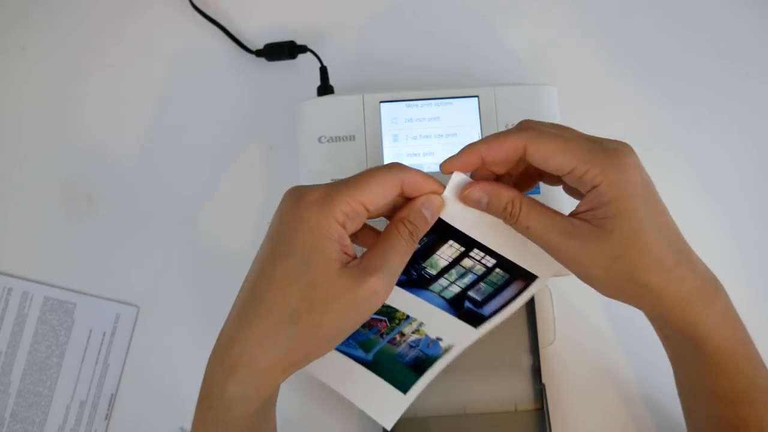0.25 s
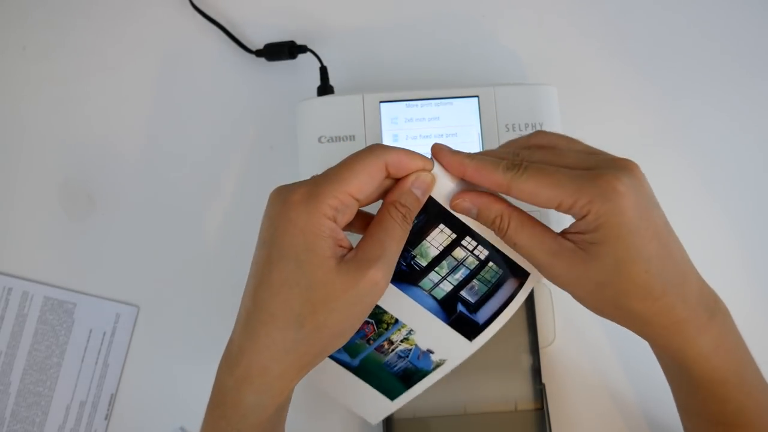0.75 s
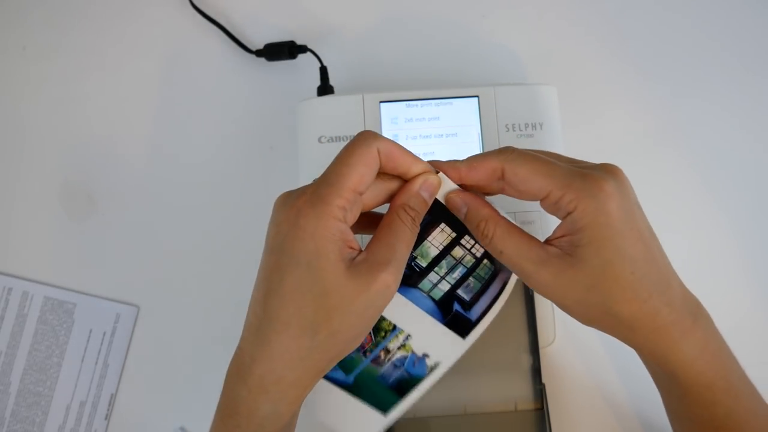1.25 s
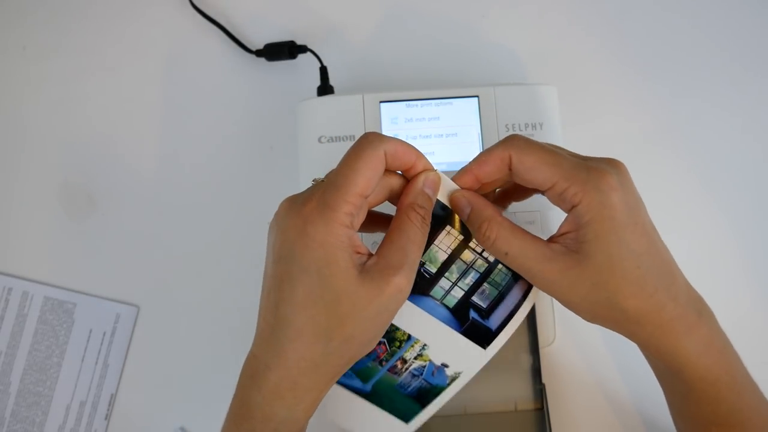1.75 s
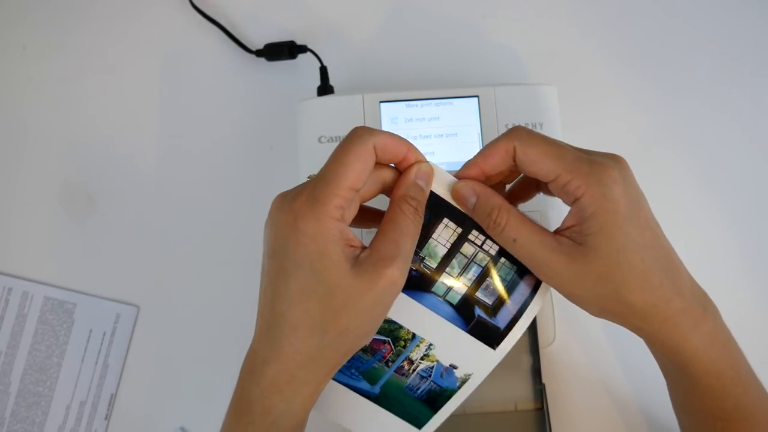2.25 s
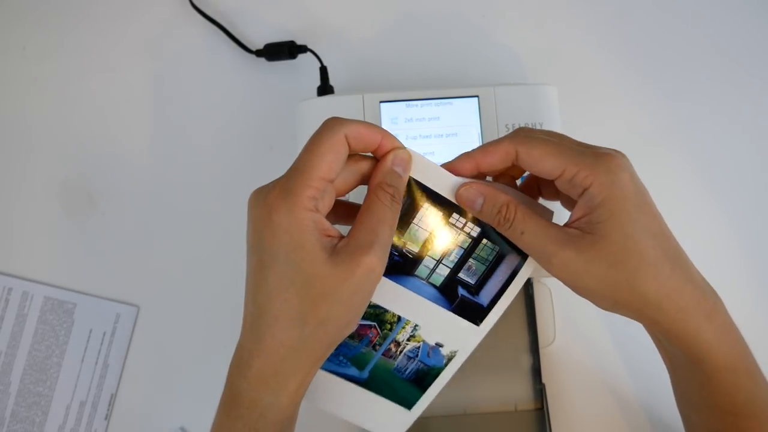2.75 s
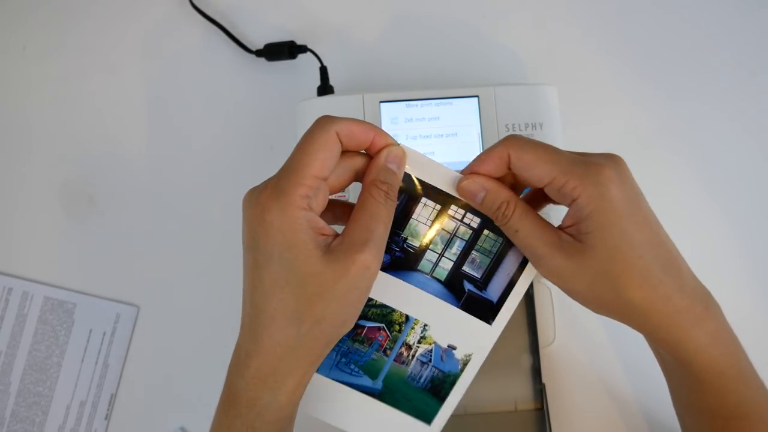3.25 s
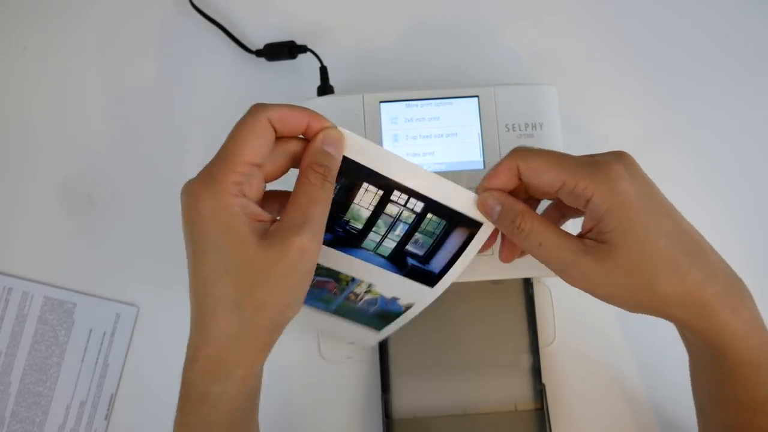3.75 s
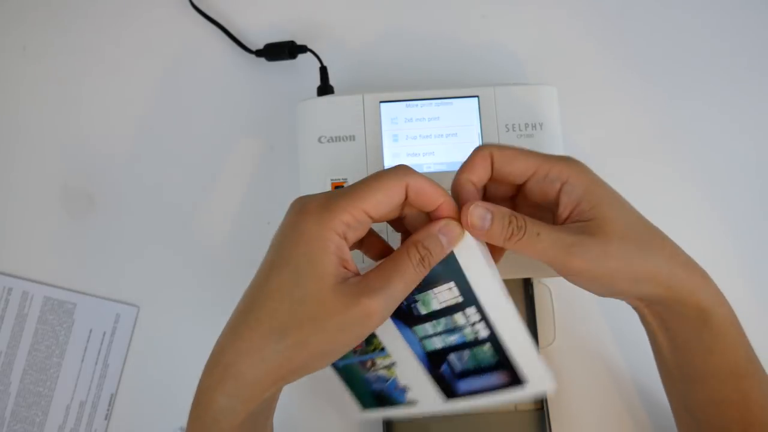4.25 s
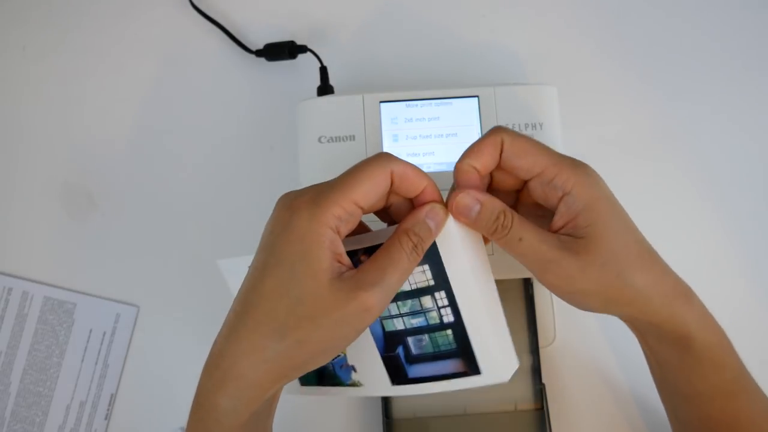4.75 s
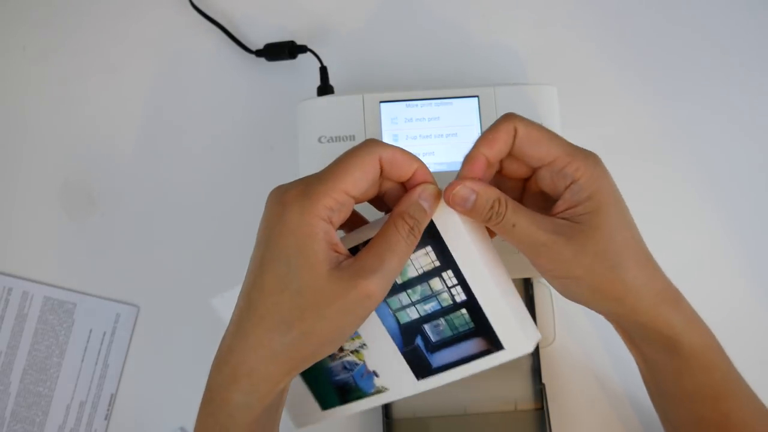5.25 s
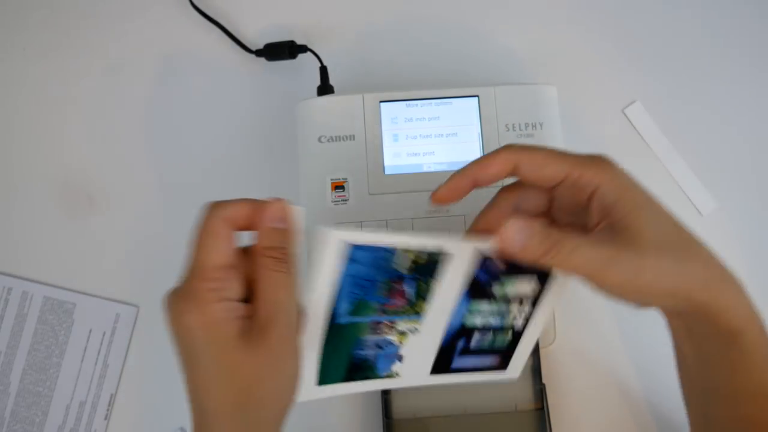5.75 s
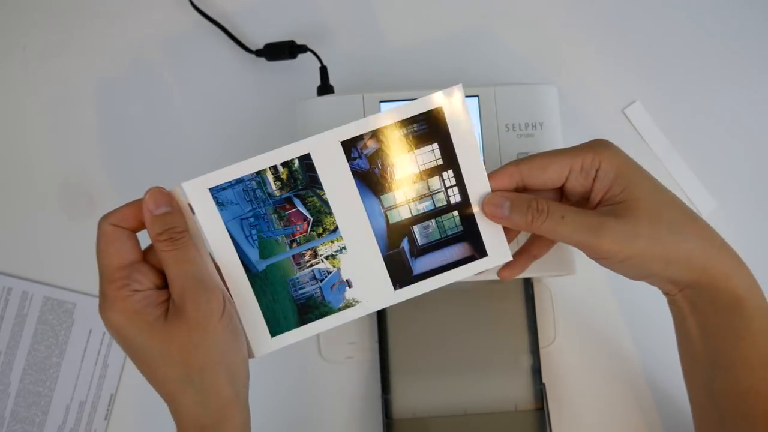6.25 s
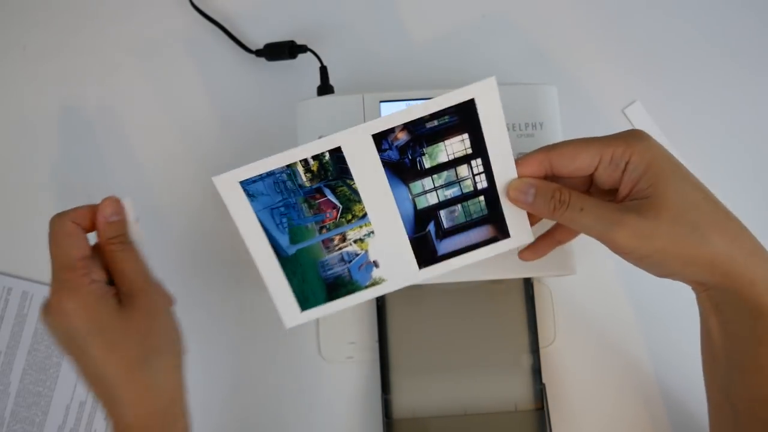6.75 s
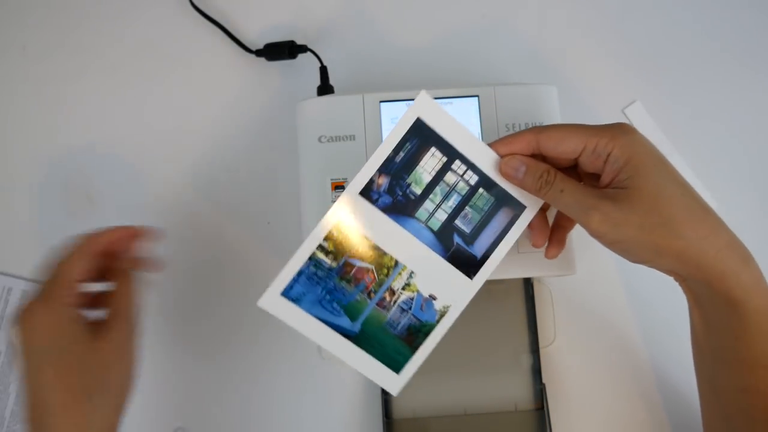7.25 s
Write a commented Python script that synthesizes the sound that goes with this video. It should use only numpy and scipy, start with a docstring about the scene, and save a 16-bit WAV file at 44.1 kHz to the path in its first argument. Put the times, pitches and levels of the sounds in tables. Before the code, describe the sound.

Hands work a paper tab off a glossy print: isolated loud snaps, light crinkling, skin rustle and a quick ripping burst over faint fan hum.

```python
"""At a desk in a small room, hands fold and snap the perforated tabs off a stiff photo print.
Cracks, creaks and the tear are filtered noise bursts; the springing card is a set of damped sines.
Rubs and grip are swarms of random clicks, squeaks and faint swishes are jittered tones, bumps low noise.
Desk echoes and a noise-built room tail follow; behind lie steady air noise and a faint fan hum."""
import sys
import numpy as np
from scipy import signal
from scipy.fft import rfft, irfft
from scipy.io import wavfile
from scipy.ndimage import uniform_filter1d

SR = 44100
rng = np.random.default_rng(int(sys.argv[2]) if len(sys.argv) > 2 else 0)


def file_out(sig):
    """Save sig as 16-bit WAV at sys.argv[1]."""
    # one column per channel
    cols = np.atleast_2d(sig).T
    # limit, then scale
    lim = np.clip(cols, -1, 1)
    pcm = np.round(lim * 32767).astype(np.int16)
    wavfile.write(sys.argv[1], SR, pcm)


N = 330573
TIME_S = np.arange(N) / SR
TOP_HZ = 16200

# Edges of the five bands in which events are coloured, in Hz.
BAND_EDGES_HZ = (200, 950, 2200, 4000, 6600, 10400)
# Cracks of the fold. Each row: time in seconds, level in dB, tilt in dB per band towards the treble,
# ring of the stiff tab in dB.
SNAPS = [(0.3296, -47, -6.5, 0), (1.172, -26, -8.5, 7), (1.178, -44, 10.5, 2), (1.1869, -18.5, 4.5, -3),
         (1.2174, -31.5, 3.5, 2), (1.4285, -48.5, -5, 10), (1.532, -48, 2.5, 3), (1.91, -43.5, -4, 5),
         (2.1489, -47, -2, 8), (2.827, -45, 5, 3.5), (2.884, -40, 2.5, -4), (2.913, -43, 5, -4),
         (3.119, -34.5, -3, 2), (3.1328, -29, 3, -3), (3.1542, -36, 4, 3), (3.1652, -34, 3.5, 2),
         (3.5258, -38, 5, 12), (3.5767, -34.5, 7.5, 10), (3.6007, -41.5, 6.5, 17), (3.6209, -43.5, 7.5, 17),
         (3.6302, -31.5, 7.5, 14.5), (3.6385, -15, 1.5, 14), (3.6499, -30, -4, 5), (3.6882, -30, 1, -4),
         (3.8875, -45, -3, 8), (4.0936, -50.5, -3.5, 5), (4.5794, -39, -0.5, 3.5), (4.624, -45, -1.5, 0),
         (4.6862, -34, -5, -4), (4.908, -52, -9, -4), (5.1479, -13.5, -0.5, 4), (5.1965, -30, -1, 2),
         (5.232, -32.5, -3, 0), (5.2537, -32.5, -2, 1.5), (6.4557, -31, 1, -4), (6.4601, -35.5, 3, -1),
         (6.464, -30.5, 0.5, -3), (6.4872, -27, 1, -3), (6.509, -31, 1, 1), (6.513, -30.5, 0.5, -3),
         (6.5586, -22.5, 2.5, 2), (6.5698, -21, 3, -8), (6.5755, -23, -6, 0), (6.5925, -20.5, 1.5, -0.5),
         (7.1733, -37.5, 0, 4), (7.2063, -25.5, 0, 0.5)]
# Colour shared by all cracks, in dB per band.
SNAP_BANDS_DB = (-9.5, -1, -4, -5.5, -10)
SNAP_DECAY_S, SNAP_SHORTER_PER_TILT_DB = 0.0016, 0.071  # decay at zero tilt; bright cracks end sooner
TAB_BAND = 3  # index of the band in which the tab rings
# Tear along the perforation. Each row: time in seconds, mean bridges broken per second,
# level in dB relative to one bridge.
TEAR = [(6.521, 260, -9.5), (6.535, 262, -5.5), (6.546, 530, -4.5), (6.56, 564, -3.5), (6.571, 380, -10),
        (6.581, 350, -5.5), (6.587, 320, -16)]
# One breaking bridge, in dB per band.
BRIDGE_BANDS_DB = (-40, -27, -28.5, -26.5, -29.5)
# The whole card springs or buckles. Each row: time in seconds, relative level in dB,
# pitch factor from its bend, share of the ring time that the fingers leave.
FLAPS = [(0.1636, -26.5, 2.09, 0.16), (.204, -42.5, 1.6, 0.31), (.355, -38.5, 1.27, 0.64),
         (3.2025, -28, 0.9, 0.4), (3.2063, -15.5, 1.12, 0.27), (3.217, -25.5, 1.22, 0.31),
         (3.641, -20.5, 1, 0.59), (4.685, -33, 1.24, 0.21), (5.1481, -9, 2.38, 0.13),
         (5.1496, -19, 1.03, 0.22), (5.791, -48, .86, 0.7), (5.925, -45.5, 1.18, 0.59),
         (6.015, -45, 1.8, 0.37), (6.579, -28.5, 1.1, .95), (6.594, -23.5, .92, 0.81)]
# Bending modes of the card when flat and free. Each row: frequency in Hz, relative level in dB, t60 in seconds.
CARD_MODES = [(134, -5.5, 0.066), (328, -4.5, 0.089), (445, 0, 0.14), (527.3, 1, 0.12), (652, -6.5, 0.1),
              (777, 2, 0.044), (865, 3, 0.029), (1114.4, 1, 0.095), (1288, -8.5, 0.034), (1600, 0.5, 0.049),
              (1680, -10, 0.12)]
# Short noisy swells: mostly strokes of skin and card, one (3.648) the stiff tab ringing on after its crack.
# Each row: start in seconds, length in seconds, relative level in dB, tilt in dB per band,
# ring of the stiff tab in dB.
RUBS = [(0.044, 0.14, -54, -0.5, 0), (0.344, 0.05, -48.5, -5, -4), (0.496, 0.031, -45, -2, -1.5),
        (0.559, 0.067, -51, -1.5, 1.5), (0.629, 0.053, -49.5, -1, -1), (1.198, 0.084, -60, 4.5, 5.5),
        (1.377, 0.087, -65, -4.5, 8), (1.664, 0.083, -57, -1, 4.5), (1.79, 0.12, -58.5, -3.5, 4),
        (1.974, 0.037, -57.5, -3.5, 4), (2.064, 0.13, -60, -0.5, 0.5), (2.393, 0.052, -56.5, -0.5, 2.5),
        (2.44, 0.09, -57.5, -1.5, 9), (3.03, .022, -54, 6.5, 0), (3.109, 0.051, -44.5, 0, 2),
        (3.648, 0.2, -53, 0, 4.5), (4.133, 0.067, -65.5, 2, 2), (4.223, 0.078, -64, 3, 0),
        (4.357, 0.066, -64, -2, 2), (4.845, 0.17, -62, 0.5, 0.5), (5.149, 0.044, -36, -4, -2),
        (5.433, .07, -50, -3, 0), (5.514, 0.1, -51, -2, -2), (5.65, 0.12, -55.5, -2.5, 2),
        (5.735, 0.19, -66.5, 6, 1), (6.006, 0.038, -56.5, 0, -7), (7.195, 0.15, -61, 2.5, 1.5)]
# Colour shared by these swells, in dB per band.
RUB_BANDS_DB = (-8, -0.5, -0.5, 1.5, -3)
RISE_SHARE = 0.22  # part of a swell in which the level builds
# The fold creaks. Each row: start in seconds, end in seconds, mean slips per second,
# level in dB relative to one slip.
CREAKS = [(1.801, 1.87, 107, -0.5), (2.124, 2.154, 294, 2), (2.33, 2.387, 116, -1.5),
          (5.1587, 5.182, 160, 17), (5.44, 5.458, 260, 5.5), (6.043, 6.056, 300, 1.5)]
# One slip of the fold, in dB per band.
CREAK_BANDS_DB = (-51, -49.5, -65, -60, -62)
# Brief squeaks and faint narrow swishes. Each row: start in seconds, length in seconds,
# mean pitch in Hz, level in dB.
SQUEAKS = [(3.022, 0.037, 1270, -39), (3.111, 0.021, 1100, -43), (6.866, 0.093, 2900, -60.5),
           (7.217, .12, 2250, -53), (7.421, 0.036, 1900, -56)]
# Light shifting of the grip. Each row: time in seconds, relative level of the card's body in dB,
# relative level of the hiss in dB.
GRIP = [(0, -68.5, -62.5), (.55, -64, -62.5), (.85, -70, -63), (1.199, -60.5, -55.5), (1.6, -57, -57),
        (2.25, -71, -66.5), (2.5, -62, -61.5), (3.05, -62, -53.5), (3.35, -69.5, -57.5),
        (3.8, -58.5, -57.5), (4.03, -71.5, -64), (4.5, -66, -62.5), (4.949, -65.5, -59),
        (5.398, -54, -56.5), (5.98, -69.5, -55.5), (6.12, -67.5, -66), (6.95, -81, -58),
        (7.5, -77.5, -65.5)]
# Spectrum of the gripped card's body. Each row: frequency in Hz, relative level in dB.
GRIP_BODY = [(200, -27.5), (850, -5.5), (1150, 8), (1900, 2.5), (3000, -4.5), (6000, -36)]
# Spectrum of the skin's hiss. Each row: frequency in Hz, relative level in dB.
GRIP_HISS = [(1500, -6), (3000, -4), (4800, -0.5), (7000, -3.5), (9500, -5), (12000, -7), (16000, -11.5)]
# Hands shift and brush the desk. Each row: start in seconds, length in seconds, level in dB at the peak.
BUMPS = [(2.69, 0.1, -63), (3.2, .08, -47), (4.09, 0.2, -62), (5.509, 0.19, -49.5), (6.181, 0.1, -60.5),
         (6.57, 0.13, -47)]
# Spectrum of the bumps. Each row: frequency in Hz, relative level in dB.
BUMP_SPECTRUM = [(20, -25), (55, -3), (90, -3.5), (150, -3.5), (300, -12), (900, -29)]
# Echoes from the desk and the printer. Each row: delay in seconds, gain (linear).
DESK = [(.0043, 0.07), (.0062, -0.11), (0.011, 0.1)]
# Tail of the room. Each row: centre in Hz, t60 in seconds, level in dB.
ROOM = [(200, 0.43, -13), (463, 0.3, -7), (850, 0.18, -2), (1280, 0.41, -12), (2406, 0.4, -7.5),
        (5200, 0.42, -12.5), (9000, 0.27, -9.5), (15000, 0.26, -41)]
# Spectrum of the room air. Each row: frequency in Hz, relative level in dB.
AIR = [(20, -9.5), (80, 2), (130, -0.5), (450, -2.5), (820, -2.5), (1050, -15.5), (1900, -15),
       (2500, -29.5), (15000, -19)]
AIR_DB = -60
# Hum of the fan. Each row: frequency in Hz, width in Hz, rms level in dB.
FAN = [(211.5, 2, -65.5), (213, 24, -67), (623, 53, -65.5)]


def undb(db):
    """Decibels to gain."""
    return 10 ** (np.asarray(db) / 20)


def unit(x):
    """Scale to rms 1."""
    return x / np.sqrt(np.mean(x ** 2) + 1e-18)


def add(out, start_s, x):
    """Mix x into out from start_s."""
    i = max(int(round(start_s * SR)), 0)
    out[i:i + len(x)] += x[:max(N - i, 0)]


def along(hz, points_hz, values):
    """Read a spectrum on a log-frequency axis."""
    return np.interp(np.log(hz + 1), np.log(points_hz), values)


def colour(x, points):
    """Filter x by (Hz, dB) points, to rms 1."""
    hz = np.fft.rfftfreq(len(x), 1 / SR)
    gain = undb(along(hz, *np.transpose(points)))
    return unit(irfft(rfft(x) * gain, len(x)))


def wander(count, step):
    """Random curve through normal draws placed every step points."""
    knots = int(count / step) + 2
    return np.interp(np.arange(count) / step, np.arange(knots), rng.standard_normal(knots))


def tinted(shared_db, level_db, tilt_db, ring_db):
    """Five band levels of one event: shared colour, tilted about the middle band, plus the tab's ring."""
    band = np.arange(len(shared_db))
    tilt_steps = np.maximum(band - 2, -1)  # both lowest bands share one step
    return np.array(shared_db) + level_db + tilt_db * tilt_steps + ring_db * (band == TAB_BAND)


def card_gain(hz, bands_db, bass_db=-20, top_db=-17, bend_hz=1300, bend_width_hz=300, bend_db=3):
    """Gain shaping unit white noise towards the band levels, lifted at the stiff card's main resonance."""
    edges = np.array(BAND_EDGES_HZ)
    density = np.array(bands_db) - 10 * np.log10(np.diff(edges) / (SR / 2))
    # two points per band hold its level flat
    anchors = np.geomspace(edges[:-1], edges[1:], num=7)[[1, 5]].T.ravel()
    levels = [density[0] + bass_db, *np.repeat(density, 2), density[-1] + top_db]
    db = along(hz, [50, *anchors, TOP_HZ], levels)
    return undb(db + bend_db / (1 + (2 * (hz - bend_hz) / bend_width_hz) ** 2))


def crack(bands_db, decay_s=0.0015, rise_s=0.00013, smooth_hz=1000, size=1024):
    """One fracture: fibres give way in a quick dying cluster, which lends each crack its own resonances."""
    hz, t = np.fft.rfftfreq(size, 1 / SR), np.arange(size) / SR
    envelope = np.exp(-t / decay_s) * (1 - np.exp(-t / rise_s))
    fibres = rfft(rng.standard_normal(size) * envelope)
    power = uniform_filter1d(np.abs(fibres) ** 2, int(smooth_hz / hz[1]) + 1)
    # fold the cepstrum: minimum phase, so the card answers causally
    cepstrum = irfft(np.log(card_gain(hz, bands_db) / np.sqrt(power)))
    cepstrum[1:size // 2] *= 2
    cepstrum[size // 2 + 1:] = 0
    return irfft(fibres * np.exp(rfft(cepstrum))) * np.sqrt(SR / 10 ** 3)


def clicks(count, per_s, scatter_db):
    """Dense tiny clicks of uneven size at random times, rms 1."""
    size = undb(scatter_db * np.minimum(rng.exponential(size=count), 4))
    return unit(rng.standard_normal(count) * size * (rng.random(count) < per_s / SR))


def swell(length_s, power):
    """Envelope that rises to 1 and lets go."""
    t = np.arange(0, length_s, 1 / SR)
    return np.interp(t, [0, RISE_SHARE * length_s, length_s], [0, 1, 0]) ** power


def snaps():
    """Single cracks as the fold is worked."""
    out = np.zeros(N)
    for s, level_db, tilt_db, ring_db in SNAPS:
        decay_s = SNAP_DECAY_S * np.exp(-SNAP_SHORTER_PER_TILT_DB * tilt_db)
        add(out, s, crack(tinted(SNAP_BANDS_DB, level_db, tilt_db, ring_db), decay_s))
    return out


def tear(unevenness=0.25, scatter_db=3.0, tint_db=1.0):
    """The paper bridges break one after another, at uneven gaps and strengths, as the tab is pulled."""
    out = np.zeros(N)
    times_s, rates_per_s, levels_db = np.transpose(TEAR)
    s = times_s[0]
    for gap, size, *tint in rng.standard_normal((60, 7)):
        bridge = crack(np.array(BRIDGE_BANDS_DB) + tint_db * np.array(tint), decay_s=0.0018)
        level_db = np.interp(s, times_s, levels_db) + scatter_db * size
        add(out, s, (s < times_s[-1]) * bridge * undb(level_db))
        s += np.exp(unevenness * gap) / np.interp(s, times_s, rates_per_s)
    return out


def flaps(detune=0.025, push_s=0.0017, gain_db=-4):
    """The released card rings in its bending modes, damped by the fingers."""
    out, t = np.zeros(N), np.arange(SR // 4) / SR
    hz, db, t60_s = np.transpose(CARD_MODES)[:, :, None]
    for s, level_db, bend, ring_share in FLAPS:
        pitch_hz = hz * bend * (1 + detune * rng.standard_normal(hz.shape))
        sines = np.sin(2 * np.pi * (pitch_hz * t + rng.random(hz.shape)))
        modes = undb(db - 60 * t / (t60_s * ring_share)) * sines
        add(out, s, undb(level_db + gain_db) * modes.sum(axis=0) * (1 - np.exp(-t / push_s)))
    return out


def rubs(gain_db=1, ripple_db=3.0, ripple_hz=200):
    """Each swell is a swarm of random clicks, coloured by its bands and a random spectral ripple."""
    out = np.zeros(N)
    for start_s, length_s, level_db, tilt_db, ring_db in RUBS:
        envelope = swell(length_s, power=0.91)
        bands_db = tinted(RUB_BANDS_DB, level_db, tilt_db, ring_db)
        drive = clicks(SR // 4, per_s=3000, scatter_db=0.5)
        hz = np.fft.rfftfreq(len(drive), 1 / SR)
        ripple = unit(undb(ripple_db * wander(len(hz), ripple_hz / hz[1])))
        rub = irfft(rfft(drive) * card_gain(hz, bands_db) * ripple)
        add(out, start_s, envelope * np.resize(rub, len(envelope)))
    return out * undb(gain_db)


def creaks(unevenness=0.29, scatter_db=-0.5):
    """The bent fold gives in a run of dull slips."""
    out = np.zeros(N)
    for s, end_s, per_s, level_db in CREAKS:
        for gap, size in rng.standard_normal((14, 2)):
            slip = crack(CREAK_BANDS_DB, decay_s=0.00099)
            add(out, s, (s < end_s) * slip * undb(level_db + scatter_db * size))
            s += np.exp(unevenness * gap) / per_s
    return out


def squeaks(jitter=0.18, overtone_db=-20):
    """Brief squeaks and faint narrow swishes of unsteady pitch, with a weak octave."""
    out = np.zeros(N)
    for start_s, length_s, hz, level_db in SQUEAKS:
        envelope = swell(length_s, power=0.26)
        pitch_hz = hz * (1 + jitter * wander(len(envelope), 46.4))
        phase = 2 * np.pi * np.cumsum(pitch_hz) / SR
        tone = np.sin(phase) + undb(overtone_db) * np.sin(2 * phase)
        add(out, start_s, undb(level_db) * envelope * tone)
    return out


def crinkles(count=70, over_grip_db=(0, 8, 1, 3, -1), scatter_db=3):
    """Tiny stray creases give way at random times, louder the harder the card is gripped."""
    out = np.zeros(N)
    times_s, body_db, _ = np.transpose(GRIP)
    starts_s = rng.uniform(0, N / SR, count)
    for s, chance in zip(starts_s, rng.standard_normal((count, len(over_grip_db)))):
        grip_db = np.interp(s, times_s, body_db)
        add(out, s, crack(grip_db + np.array(over_grip_db) + scatter_db * chance))
    return out


def grip(body_gain_db=-2, hiss_gain_db=-3, flutter_db=4.1):
    """The held card creaks faintly and skin whispers over it: sparse and dense clicks, fluttering in level."""
    times_s, *columns = np.transpose(GRIP)
    body_db, hiss_db = (np.interp(TIME_S, times_s, c) for c in columns)
    body = colour(clicks(N, per_s=1000, scatter_db=2.0), GRIP_BODY) * undb(body_db + body_gain_db)
    hiss = colour(clicks(N, per_s=12000, scatter_db=4.5), GRIP_HISS) * undb(hiss_db + hiss_gain_db)
    return (body + hiss) * undb(flutter_db * wander(N, SR / 30))


def bumps():
    """Dull low noise of the hands as they change their hold."""
    out = np.zeros(N)
    for start_s, length_s, level_db in BUMPS:
        envelope = swell(length_s, power=1.0)
        thud = colour(rng.standard_normal(SR // 4), BUMP_SPECTRUM)
        add(out, start_s, undb(level_db) * envelope * np.resize(thud, len(envelope)))
    return out


def room_tail(build_s=0.00053):
    """Diffuse echoes that build up quickly and die at each band's own rate."""
    t = np.arange(SR // 2) / SR
    noise, hz = rfft(rng.standard_normal(len(t))), np.fft.rfftfreq(len(t), 1 / SR)
    centres_hz, tail = np.transpose(ROOM)[0], 0
    for share, (_, t60_s, db) in zip(np.eye(len(ROOM)), ROOM):
        decay = undb(-60 * t / t60_s) * (1 - np.exp(-(t / build_s) ** 2))
        band = irfft(noise * along(hz, centres_hz, share), len(t))
        tail = tail + undb(db) * band * decay / np.sqrt(np.sum(decay ** 2))
    return tail


def fan():
    """Wavering hum: noise through narrow resonances."""
    hz, hum = np.fft.rfftfreq(N, 1 / SR), 0
    for centre_hz, width_hz, db in FAN:
        resonance = 1 / (1 + ((hz - centre_hz) / width_hz * 2) ** 2)
        hum = hum + undb(db) * unit(irfft(rfft(rng.standard_normal(N)) * resonance, N))
    return hum


def background(side_db=-19):
    """Still room air as coloured noise, plus the fan in the middle; returns mid and side."""
    air = colour(rng.standard_normal(N), AIR) * undb(AIR_DB)
    return air + fan(), colour(rng.standard_normal(N), AIR) * undb(AIR_DB + side_db)


def scene(room_side_db=-19):
    """The card and its desk echoes are central; room tail and air add a little width."""
    mid, side = background()
    card = grip() + flaps() + snaps() + rubs() + squeaks() + tear() + creaks() + crinkles() + bumps()
    mid = mid + card + signal.fftconvolve(card, room_tail())[:N]
    for delay_s, gain in DESK:
        add(mid, delay_s, gain * card)
    side = side + undb(room_side_db) * signal.fftconvolve(card, room_tail())[:N]
    return np.array([mid + side, mid - side])


def record(dry):
    """The recorder clips at full scale, then cuts the top."""
    lowpass = signal.ellip(10, 0.1, 70, TOP_HZ, fs=SR, output="sos")
    return signal.sosfilt(lowpass, np.clip(dry, -1, 1))


dry = scene()
out = record(dry)
file_out(out)
```